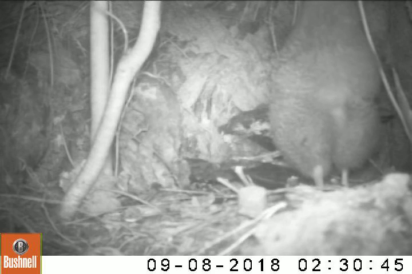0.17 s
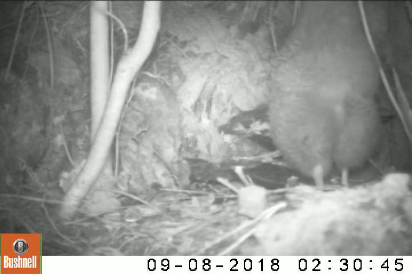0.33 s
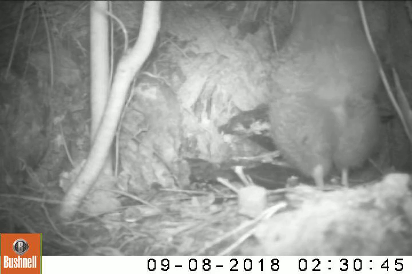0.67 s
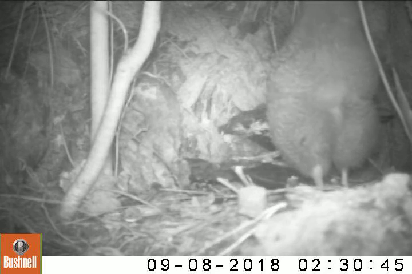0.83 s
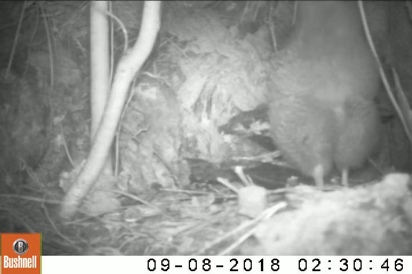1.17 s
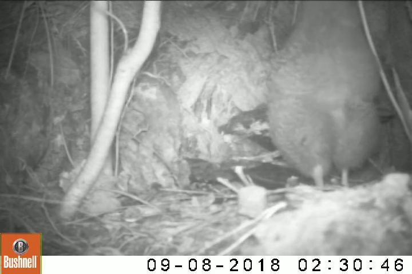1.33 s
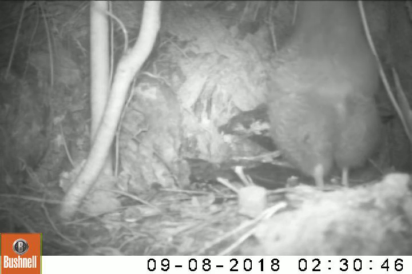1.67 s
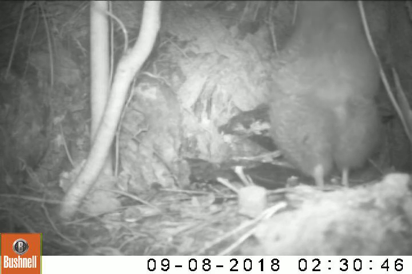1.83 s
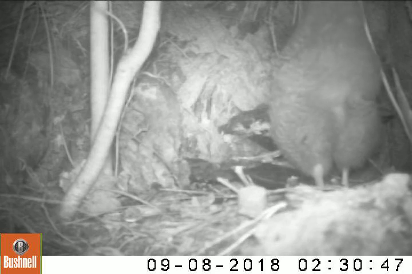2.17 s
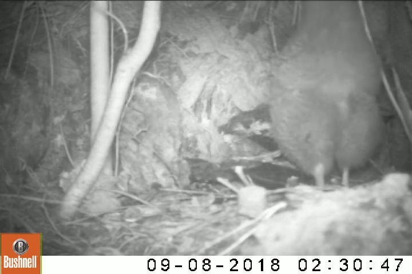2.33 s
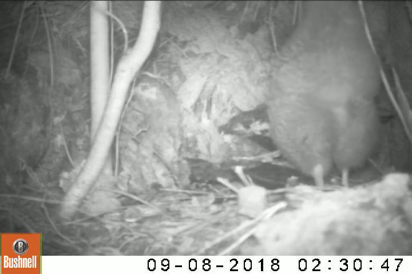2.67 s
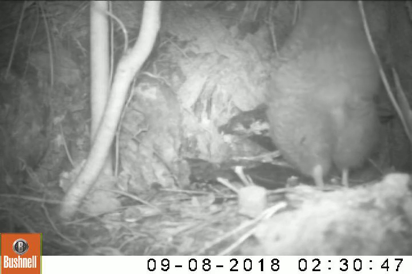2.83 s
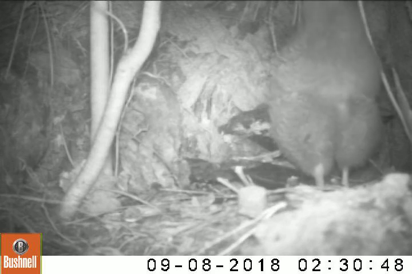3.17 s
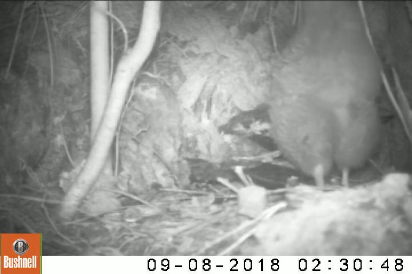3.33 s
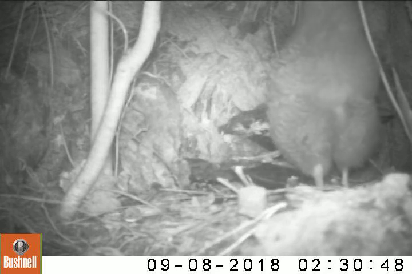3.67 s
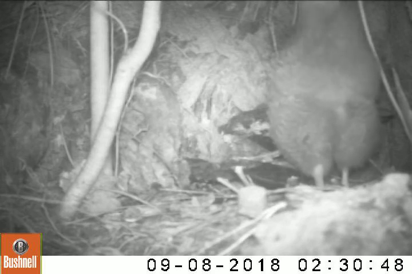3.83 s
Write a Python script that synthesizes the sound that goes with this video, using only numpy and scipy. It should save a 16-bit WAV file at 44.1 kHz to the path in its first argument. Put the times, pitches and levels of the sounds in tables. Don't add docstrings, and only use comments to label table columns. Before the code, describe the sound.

A large ground bird close to the microphone shrieks six times, each call starting with a short croak, climbing in a fast trilled whistle and ending in a breathy hiss; quiet night forest, faint low rumble.

```python
import sys
import numpy as np
from scipy import signal
from scipy.fft import rfft, irfft, next_fast_len
from scipy.io import wavfile
from scipy.ndimage import uniform_filter1d

SR = 44100
rng = np.random.default_rng(int(sys.argv[2]) if len(sys.argv) > 2 else 0)


def put_to_file(sound):
    columns = np.atleast_2d(sound).T
    safe = np.clip(columns, -1, 1)
    whole_steps = np.round(safe * 32767)
    wavfile.write(sys.argv[1], SR, whole_steps.astype(np.int16))


def gain_from_db(level_db):
    decades = np.asarray(level_db, float) / 20
    return 10 ** decades


N = 176400

# croak start t/s, whistle start t/s, whistle end t/s, croak level/dB, second overtone level/dB
CALLS = [
    (0.248, 0.274, 0.53, -44, -4),
    (.823, 0.85, 1.09, -43.5, -0.5),
    (1.486, 1.507, 1.773, -44, -0.2),
    (2.158, 2.186, 2.441, -43.5, -1),
    (2.88, 2.904, 3.163, -44.5, -0.5),
    (3.575, 3.605, 3.874, -45.5, 1.4),
]
# crest t/s, crest f/Hz, trough t/s, trough f/Hz, knee of the climb f/Hz
STROKES_1 = [(0.289, 1462, 0.303, 1193, 1464), (0.326, 1550, 0.346, 1279, 1366),
             (0.371, 1612, 0.39, 1331, 1465), (0.412, 1649, 0.428, 1399, 1481),
             (0.455, 1757, 0.47, 1505, 1608), (0.507, 1879, 0.527, 1696, 1831)]
STROKES_2 = [(0.862, 1442, 0.876, 1185, 1339), (0.901, 1526, 0.917, 1263, 1331),
             (0.945, 1616, 0.961, 1363, 1450), (0.983, 1645, 1.0, 1379, 1491),
             (1.029, 1691, 1.045, 1441, 1477), (1.074, 1699, 1.089, 1640, 1596)]
STROKES_3 = [(1.519, 1343, 1.529, 1177, 1304), (1.553, 1533, 1.57, 1282, 1322),
             (1.596, 1618, 1.611, 1359, 1382), (1.638, 1636, 1.653, 1387, 1453),
             (1.682, 1691, 1.694, 1475, 1515), (1.723, 1853, 1.737, 1619, 1663),
             (1.757, 1921, 1.773, 1685, 1791)]
STROKES_4 = [(2.192, 1320, 2.2, 1167, 1323), (2.226, 1486, 2.24, 1272, 1307),
             (2.27, 1596, 2.285, 1346, 1366), (2.311, 1654, 2.326, 1406, 1461),
             (2.353, 1692, 2.368, 1479, 1535), (2.396, 1859, 2.409, 1610, 1606),
             (2.431, 1983, 2.446, 1747, 1788)]
STROKES_5 = [(2.909, 1216, 2.917, 1191, 1246), (2.937, 1539, 2.958, 1215, 1446),
             (2.982, 1566, 2.997, 1305, 1351), (3.024, 1651, 3.036, 1393, 1453),
             (3.065, 1656, 3.079, 1466, 1507), (3.106, 1857, 3.123, 1588, 1599),
             (3.144, 2016, 3.163, 1803, 1801)]
STROKES_6 = [(3.612, 1265, 3.624, 1139, 1268), (3.648, 1509, 3.667, 1230, 1365),
             (3.688, 1581, 3.707, 1325, 1387), (3.732, 1655, 3.744, 1412, 1459),
             (3.774, 1747, 3.785, 1490, 1538), (3.817, 1872, 3.832, 1670, 1613),
             (3.855, 2027, 3.874, 1800, 2007)]
# climb level/dB, crest level/dB, push after the crest level/dB, choke level/dB
EFFORT_1 = [(-34, -27.5, -18.5, -21.5), (-18.5, -26, -25.5, -17.5), (-22.5, -25.5, -22, -21.5),
            (-18, -23, -18, -21.5), (-18, -21.5, -17.5, -16), (-19.5, -22, -20, -26)]
EFFORT_2 = [(-27.5, -31.5, -17, -28), (-20.5, -27.5, -19.5, -20), (-19.5, -25, -19.5, -22.5),
            (-18.5, -18, -16.5, -22.5), (-20.5, -18.7, -15, -24), (-20.5, -19, -19.5, -22)]
EFFORT_3 = [(-29.5, -22, -17, -24), (-23, -24, -19.5, -20.2), (-20.7, -20.5, -18, -23.5),
            (-21, -15.5, -16, -24.5), (-19, -17.5, -13.5, -20.5), (-15.5, -18, -12.5, -15.5),
            (-15.5, -16, -19, -25.5)]
EFFORT_4 = [(-33.0, -21.3, -19, -28), (-21, -27.5, -18, -21.0), (-19.5, -21.5, -20, -24),
            (-19, -18, -14.5, -26), (-18.5, -15.5, -13.5, -28.5), (-18.5, -13.5, -12.5, -15.5),
            (-16.5, -10.5, -20.5, -17.5)]
EFFORT_5 = [(-23.5, -20, -28.5, -21.5), (-26.8, -30, -29.5, -18), (-18, -22.5, -19, -22),
            (-20, -16.5, -15.5, -27), (-19.5, -15, -14, -27), (-17, -15, -14, -17.1),
            (-14, -11.5, -13.5, -21)]
EFFORT_6 = [(-24, -23, -22.5, -24), (-28.5, -26.5, -21.5, -20.5), (-20.5, -23.5, -22, -19),
            (-18.5, -18, -15, -23.9), (-19.1, -13.5, -15, -22.5), (-19, -17.5, -11.5, -14.5),
            (-12, -13.2, -14.5, -22.4)]


def bird():
    earlier_s, earlier_db = 0.36, 6.5
    strokes = [STROKES_1, STROKES_2, STROKES_3, STROKES_4, STROKES_5, STROKES_6]
    efforts = [EFFORT_1, EFFORT_2, EFFORT_3, EFFORT_4, EFFORT_5, EFFORT_6]
    out = np.zeros(N + 2 * SR)
    for times, moves, effort in zip(CALLS, strokes, efforts):
        place(out, call(*times, moves, effort), 1 + times[0])
    earlier = call(*CALLS[1], strokes[1], efforts[1])
    place(out, gain_from_db(earlier_db) * earlier, 1 - earlier_s)
    return out


def place(out, sound, seconds):
    at = round(seconds * SR)
    out[at:at + len(sound)] += sound


def call(begin, start, end, croak_db, second_db, strokes, effort):
    t = np.arange(0, end - begin + 0.1, 1 / SR)
    s = t + begin
    crest, _, fall, _, _ = np.transpose(strokes)
    before = np.append(start, fall[:-1])
    knee = before + 0.6 * (crest - before)
    hz, peak = pitch(s, start, knee, strokes)
    db, stress, nick = push(s, knee, crest, effort)
    pinch = np.minimum(stress, 0)

    broken = np.clip((s - end) / 0.0051 + 1, 0, 1)
    db = db + 7 * broken * np.minimum(wobble(len(t), 0.0015) - 0.5, 0)
    roughness = 0.003 * (1 - pinch / 5 + 18 * broken)
    turns = np.cumsum(hz * (1 + roughness * wobble(len(t), 0.0002))) / SR

    gape = np.clip((s - start) / (end - start), 0, 1)
    mouth = 3788 + (4780 - 3788) * gape
    sound = whistle(s, start, end, second_db, hz, turns, mouth, db, stress, nick, peak)
    sound += breath(s, start, end, turns, db, pinch)
    sound += gasp(s, end)
    sound += beak_hiss(t, s, start, end, turns, gape, mouth, pinch, peak)
    shut = np.clip((end + 0.032 - s) / 0.012, 0, 1) ** 2
    return shut * sound + croak(t, start - begin, croak_db)


def pitch(s, start, knee, strokes):
    crest, top, fall, low, knee_hz = np.transpose(strokes)
    middle = (crest + fall) / 2
    middle_hz = top - 0.33 * (top - low)
    times = np.ravel([knee, crest, middle, fall], "F")
    hz = np.interp(s, times, np.ravel([knee_hz, top, middle_hz, low], "F"))
    knots = np.append(start, np.ravel([crest, fall], "F"))
    swing = np.interp(s, knots, np.arange(len(knots)) % 2)
    return uniform_filter1d(hz, round(0.0045 * SR)), swing ** 2 - 0.4


# t/s, depth level/dB
CRACKS = [(0.32, -16.5), (0.3523, -11.5), (0.3906, -6.5), (0.3936, -5.5), (0.8917, -13.5), (0.9246, -22),
          (0.9655, -14), (1.0072, -22.5), (1.576, -5), (1.6167, -10), (1.6582, -15), (1.662, -20.5),
          (2.2464, -20.5), (2.2511, -18.5), (2.2885, -6), (2.4304, -9.5), (2.9584, -6), (2.9604, -10),
          (2.9652, -9.5), (3.075, -10.5), (3.636, -16), (3.6707, -10.5), (3.7086, -12.5), (3.7117, -10)]
# t/s, depth level/dB
NICKS = [(0.283, -4), (.429, -5), (.451, -5), (.492, -5), (.982, -5.5), (1.015, -3), (1.045, -5),
         (1.587, -4), (1.638, -3), (1.717, -11), (1.737, -2), (1.762, -6), (2.299, -3.5), (2.394, -6.5),
         (2.411, -4.5), (3.011, -5), (3.023, -3), (3.104, -6), (3.124, -3.5), (3.143, -5), (3.156, -6),
         (3.732, -0.5), (3.774, -4), (3.811, -4), (3.830, -2.5), (3.844, -5)]


def push(s, knee, crest, effort):
    push_s, choke_s = 0.006, 0.011
    times = np.ravel([knee, crest, crest + push_s, crest + choke_s], "F")
    force = np.interp(s, times, np.ravel(effort))
    db = uniform_filter1d(force, round(0.024 * SR))
    return db, force - db + dips(s, CRACKS), dips(s, NICKS)


def dips(s, events):
    return sum(depth * np.exp(-((s - at) / 0.002) ** 2) for at, depth in events)


OVERTONE_DB = [0, -19, -18.5, -32.5, -23.5, -28, -26, -32.5, -39.5]
CREST_DB = [1.5, 14, 2.5, 10.5, 13, 10, 12, 11.5, 10]
# f/Hz, level/dB
TRACT = [(800, -9.5), (1150, -8.5), (1400, -3.5), (1650, 2), (1850, 3), (2050, -6.5), (2400, -21),
         (2900, -5.5),
         (3350, 2.5), (3900, -7), (4500, -8), (5300, -10.5), (6200, -20), (8000, -18.5), (11300, -21),
        (14500, -21.5)]


def whistle(s, start, end, second_db, hz, turns, mouth, db, stress, nick, peak):
    hoarse = np.clip((s - end) / 0.041 + 1, 0, 1.5)
    tone = np.zeros(len(s))
    for k, (overtone_db, crest_db) in enumerate(zip(OVERTONE_DB, CREST_DB)):
        own_hz = (k + 1) * hz
        level = overtone_db + crest_db * peak
        level = level + 8 * np.exp(-((own_hz - mouth) / 300) ** 2)
        shimmer = 1.4 * wobble(len(s), 0.0041)
        if k == 0:
            level += stress + nick + 0.25 * shimmer
        else:
            level += 0.35 * stress - 10 * hoarse + 2.35 * shimmer
        if k == 1:
            level += second_db
        blur = 0.075 * max(k - 2, 0) ** 1.5 * wobble(len(s), 0.0015)
        tone += gain_from_db(level) * np.cos(2 * np.pi * (k + 1) * turns + blur) * (own_hz < 15000)
    fade = gain_from_db(db - 1000 * np.maximum(s - end, 0))
    rise = np.clip((s - start) / 0.006, 0, 1)
    return coloured(np.sqrt(2) * rise * fade * tone, TRACT)


def pulsing(turns):
    return 1 + 0.38 * np.cos(2 * np.pi * turns)


# f/Hz, level/dB
AIR = [(330, -30), (460, -14.5), (700, -23.5), (1100, -17.5), (1900, -1), (2500, -21), (3400, -3),
       (4500, -12.5),
       (5900, -22), (8000, -22), (11300, -18), (13500, -25.5), (15500, -27)]


def breath(s, start, end, turns, db, pinch):
    rise = np.clip((s - start) / 0.006, 0, 1)
    level = -48.5 + 0.52 * (db + 19.5) - 7 * np.tanh(pinch / 10)
    level += 3 * wobble(len(s), 0.0087) - 800 * np.maximum(s - end, 0)
    noise = pulsing(turns) * rng.standard_normal(len(s))
    return rise * gain_from_db(level) * evened(coloured(noise, AIR))


# f/Hz, level/dB
GASP = [(280, -39), (450, -20.5), (1100, -16.5), (1850, 3.5), (2450, -6.5), (3200, -17.5), (4500, -13.5),
        (5600, -31),
        (8000, -43), (11500, -29), (15000, -52)]


def gasp(s, end):
    level = -34.5 - 500 * np.maximum(s - end, 0) + 3 * wobble(len(s), 0.0015)
    swell = np.exp(np.minimum(s - end, 0) / 0.014)
    return gain_from_db(level) * swell * evened(coloured(rng.standard_normal(len(s)), GASP))


# from f/Hz, to f/Hz, width f/Hz, from level/dB, to level/dB
SIZZLE = [
    (7300, 9400, 270, -69, -64),
    (9200, 12000, 500, -64, -65),
    (10870, 12000, 320, -59.5, -56.5),
    (12500, 10000, 700, -62.5, -64.5),
]


def beak_hiss(t, s, start, end, turns, gape, mouth, pinch, peak):
    opening = 0.12 + 0.74 * np.clip((s - start + 0.0088) / 0.017, 0, 1)
    fade = gain_from_db(3 * wobble(len(t), 0.0042) - 800 * np.maximum(s - end, 0))
    flow = opening * np.clip(t / 0.004, 0, 1) * fade
    mouth_db = -48.5 + 1.5 * gape - 0.5 * np.tanh(pinch / 10)
    air = gain_from_db(mouth_db) * resonate(rng.standard_normal(len(t)), mouth, 300)
    gate = pulsing(turns)
    for from_hz, to_hz, width, from_db, to_db in SIZZLE:
        band = resonate(rng.standard_normal(len(t)), from_hz + (to_hz - from_hz) * gape, width)
        level = from_db + (to_db - from_db) * gape + 2.5 * peak + 3 * wobble(len(t), 0.012)
        air += gate * gain_from_db(level) * band
    return flow * air


# f/Hz, width f/Hz, level/dB
CROAK = [
    (410, 150, 0),
    (710, 160, -7),
    (900, 180, -2),
    (1306, 220, 11.5),
    (3400, 330, -4.5),
    (3900, 640, -1.5),
    (10910, 1200, -15),
]


def croak(t, length, db):
    pulse_hz, jitter, air = 450, 0.15, 0.55
    turns = np.cumsum(pulse_hz * (1 + jitter * wobble(len(t), 0.00063))) / SR
    pulses = evened(np.diff(np.floor(turns), prepend=-1))
    drive = pulses + air * rng.standard_normal(len(t))
    u = t[:900]
    ring = np.zeros(len(u))
    for k, (hz, width, level) in enumerate(CROAK):
        decay = np.exp(-np.pi * width * u)
        ring += (-1) ** k * gain_from_db(level) * decay * np.sin(2 * np.pi * hz * u)
    ring = signal.lfilter(*signal.butter(4, 290, btype="high", fs=SR), ring)
    shape = np.clip(t / 0.005, 0, 1) * gain_from_db(-1200 * np.maximum(t - length, 0))
    return gain_from_db(db) * shape * evened(signal.oaconvolve(drive, ring)[:len(t)])


# delay t/s, level/dB
BOUNCE = [(0.002484, -14.5), (0.0014, -20.5), (.0033, -20.5), (0.0059, -14)]


def forest(x):
    t60_s, delay_s, echo_db, top_hz = 0.5, 0.022, -52.5, 8000
    near = np.zeros(600)
    near[0] = 1
    for delay, db in BOUNCE:
        near[round(delay * SR)] = gain_from_db(db)
    t = np.arange(SR) / SR
    tail = rng.standard_normal(SR) * gain_from_db(-60 * t / t60_s) * np.clip(t / delay_s - 1, 0, 1)
    tail = signal.lfilter(*signal.butter(1, top_hz, fs=SR), tail)
    tail /= np.linalg.norm(tail)
    close = signal.oaconvolve(x, near)[:len(x)]
    return close + gain_from_db(echo_db) * signal.oaconvolve(x, tail)[:len(x)]


# f/Hz, level/dB
FLOOR = [(20, -2), (60, -1.5), (130, -12.5), (250, -18), (700, -26), (3500, -32), (6000, -40), (15800, -39)]
# f/Hz, level/dB
WHINE = [(15625, -87)]


def night_floor():
    t = np.arange(N) / SR
    noise = gain_from_db(-61.5) * evened(coloured(rng.standard_normal(N), FLOOR))
    return noise + sum(np.sqrt(2) * gain_from_db(db) * np.sin(2 * np.pi * hz * t) for hz, db in WHINE)


def evened(x):
    return x / np.sqrt(np.mean(x ** 2) + 1e-20)


def coloured(x, points):
    size = next_fast_len(len(x))
    f, db = np.transpose(points)
    hz = np.fft.rfftfreq(size, 1 / SR) + 1
    gain = gain_from_db(np.interp(np.log(hz), np.log(f), db))
    return irfft(rfft(x, size) * gain, size)[:len(x)]


def wobble(count, seconds):
    size = max(round(seconds * SR), 2)
    drift = uniform_filter1d(rng.standard_normal(count), size)
    return evened(uniform_filter1d(drift, size))


def resonate(x, hz, width):
    turn = np.exp(2j * np.pi * np.cumsum(hz) / SR)
    r = np.exp(-np.pi * width / SR)
    ring = signal.lfilter([1], np.convolve([1, -r], [1, -r]), x / turn)
    return evened((turn * ring).real)


def scene():
    return (forest(bird())[SR:SR + N] + night_floor())[None]


def roll_off(x):
    return signal.sosfilt(signal.butter(12, 15850, fs=SR, output="sos"), x)


def record(dry):
    return roll_off(dry)


dry = scene()
out = record(dry)
put_to_file(out)
```